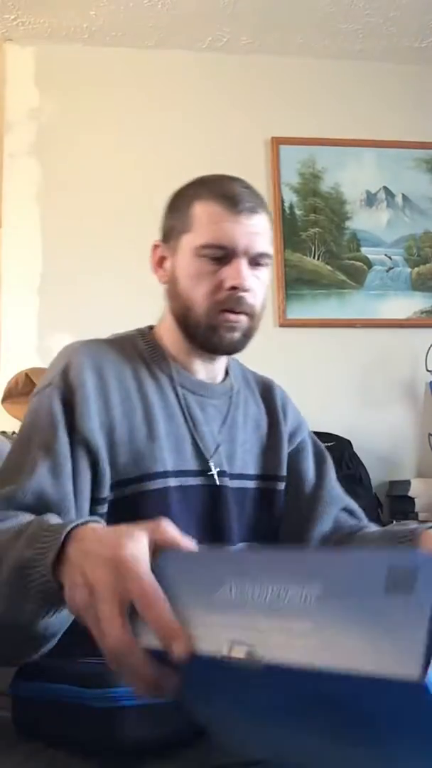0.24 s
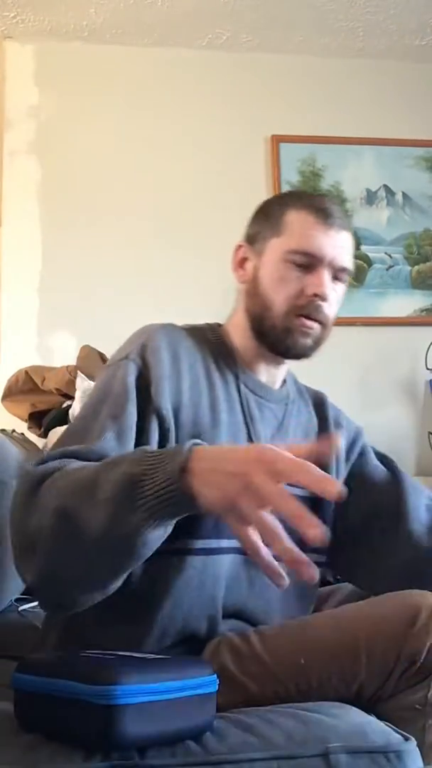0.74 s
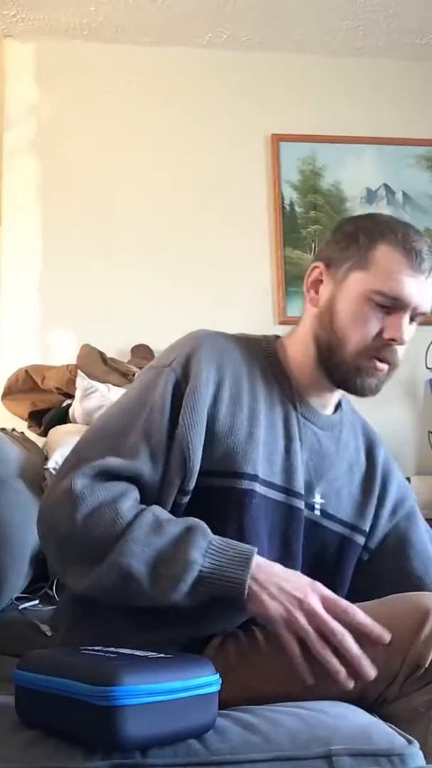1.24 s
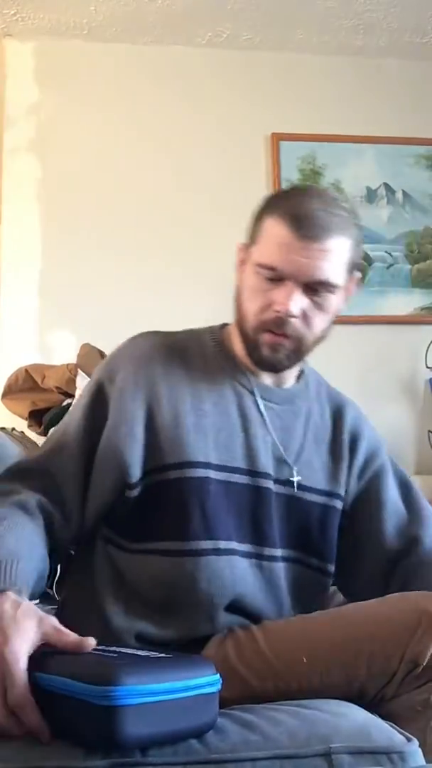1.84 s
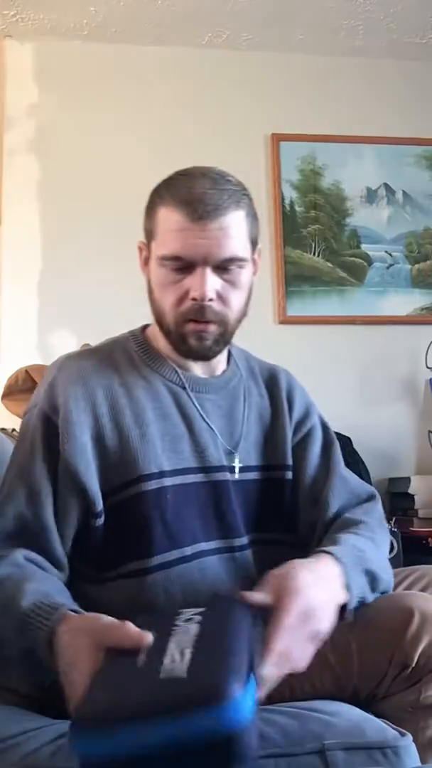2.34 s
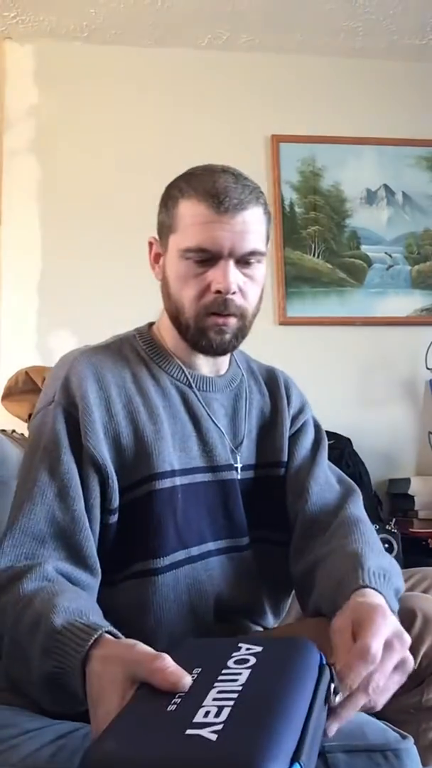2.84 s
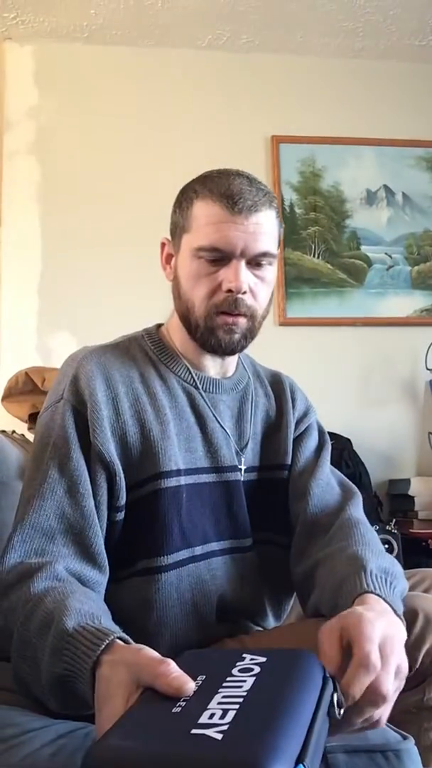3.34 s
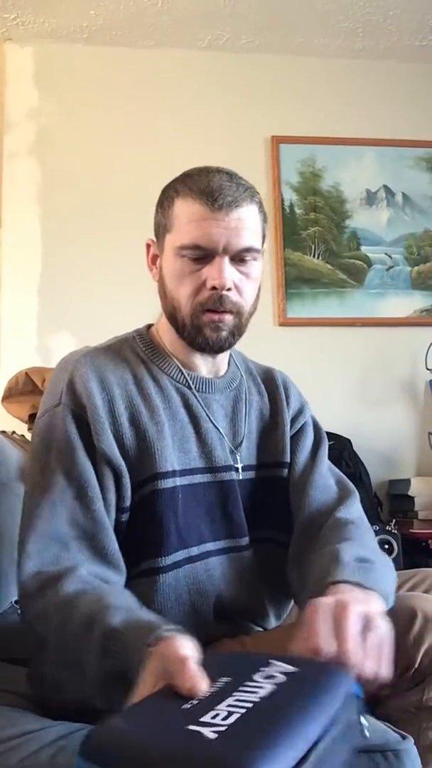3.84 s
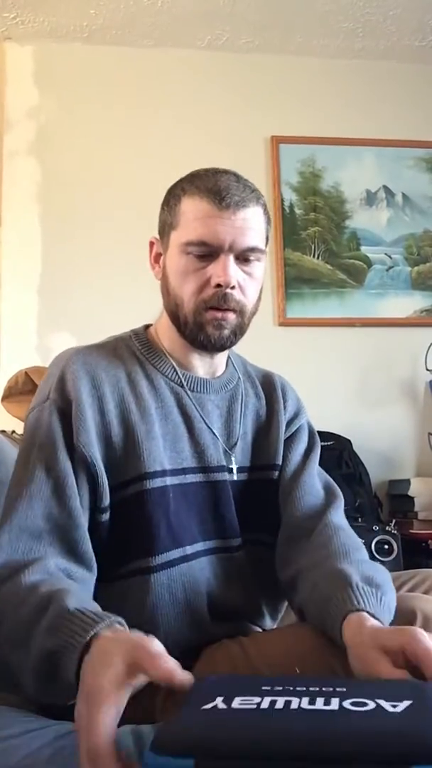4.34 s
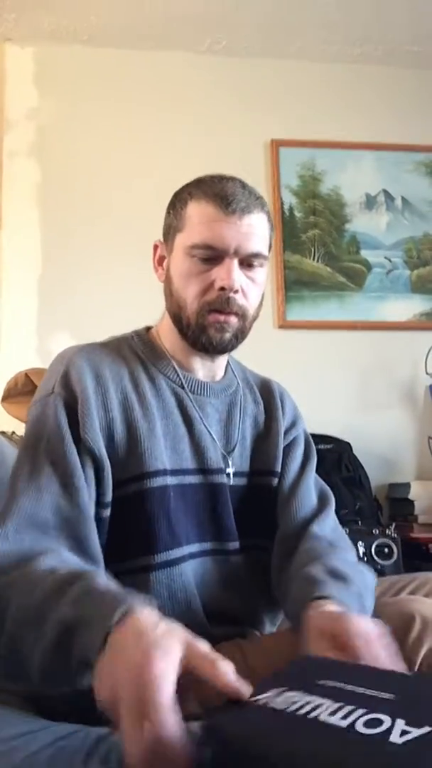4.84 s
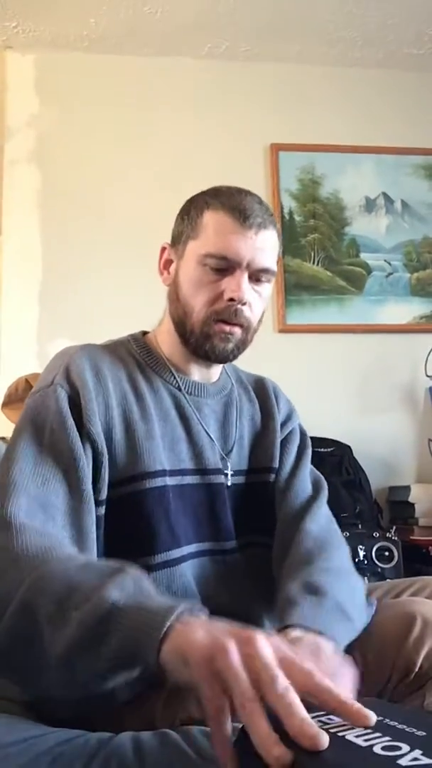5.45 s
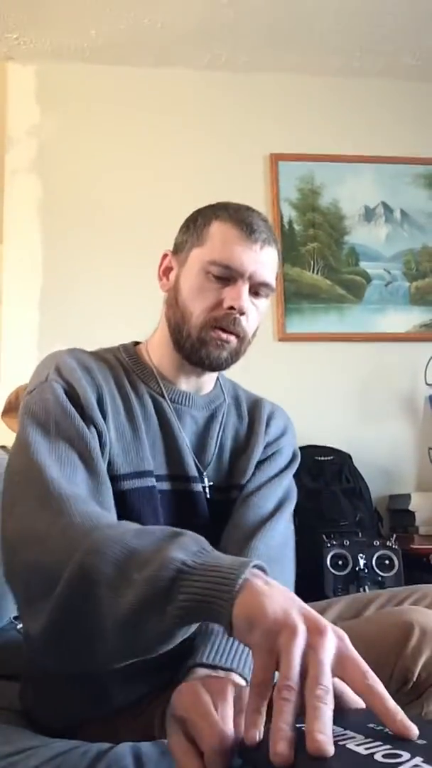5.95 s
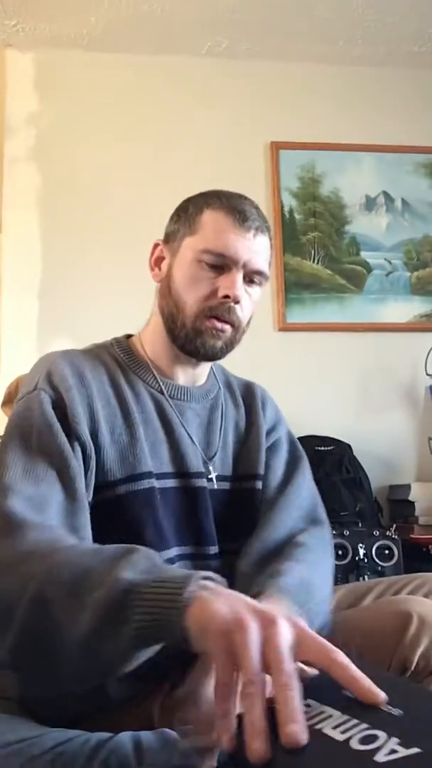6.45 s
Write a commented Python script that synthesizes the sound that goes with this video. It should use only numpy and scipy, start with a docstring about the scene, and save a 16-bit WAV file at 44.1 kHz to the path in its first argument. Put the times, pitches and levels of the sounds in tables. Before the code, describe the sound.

In a small living room, hands scuff a cardboard box and toss it aside. It lands with a double slap, the loudest sound, and slides a little. Close to the microphone, a hard case is then handled on a sofa with light knocks and cloth brushing. It is unzipped in quiet, separate tugs that tick when slow and rasp higher when fast, interrupted by a cluster of muffled bumps.

```python
"""A cardboard box rubs and squeaks against hands and clothes as a man lifts it off his lap.
Tossed aside in the small living room, it lands with a slap, tips over and slides; its panels ring.
He bumps and turns a hard carrying case on the sofa, then unzips it in several short pulls:
the slider ticks over the teeth, buzzing higher as it speeds up, and the shell of the case resounds."""
import sys
import numpy as np
from scipy import signal
from scipy.io import wavfile

SR = 44100
rng = np.random.default_rng(int(sys.argv[2]) if len(sys.argv) > 2 else 0)


def digitize_waveform(pressure):
    """Quantize a signal to 16-bit integers and store it at the path in sys.argv[1].

    Rows of a 2-D input are taken as channels; values are limited to [-1, 1].
    """
    field = np.atleast_2d(pressure).T
    bounded = np.clip(field, -1, 1)
    quanta = np.round(bounded * 32767).astype(np.int16)
    wavfile.write(sys.argv[1], SR, quanta)


N = 294588
TIME = np.arange(N) / SR


def amp(db):
    """Turns decibels into a number to multiply by."""
    return 10 ** (np.asarray(db) / 20)


def look_up(points, hz):
    """Reads between the rows of a table, on a log-frequency axis."""
    freqs, values = np.transpose(points)
    return np.interp(np.log(hz + 1), np.log(freqs), values)


def add(mix, start_s, sound):
    """Lays a sound into the mix."""
    part = mix[round(start_s * SR):][:len(sound)]
    part += sound[:len(part)]


def colour(x, spectrum, size=4096):
    """Gives a sound the tone of a (frequency, level) table; white noise keeps its power."""
    log_gain = np.log(amp(look_up(spectrum, abs(np.fft.fftfreq(size, 1 / SR)))))
    response = np.exp(np.conj(signal.hilbert(log_gain)))  # rings after a hit, never before
    kernel = np.fft.ifft(response).real[:size // 2]
    return signal.oaconvolve(x, kernel / np.linalg.norm(kernel))[:len(x)]


def soften(x, hz):
    """Dulls the sound above hz (a one-pole low-pass)."""
    pole = np.exp(-2 * np.pi * hz / SR)
    return signal.lfilter([1 - pole], [1, -pole], x)


def waver(hz):
    """A random wobble of typical size 1, up to about hz."""
    wobble = soften(soften(rng.standard_normal(N), hz), hz)
    return wobble / wobble.std()


def die_away(t, ring_s):
    """A fade that drops 60 dB in the ring time."""
    return np.exp(-np.log(1000) * t / ring_s)


def friction(per_s, spread_db):
    """Rubbing: tiny slips of uneven size at random moments."""
    slips = rng.standard_normal(N) * (rng.random(N) < per_s / SR)
    slips *= amp(spread_db * np.minimum(rng.exponential(1, N), 4))
    return slips / slips.std()


def stroke(peak_s, rise, fall, shape=1.6):
    """One movement swells to 1 and fades; shape 1 is pointed, 2 is a bell."""
    distance = np.maximum((peak_s - TIME) / rise, (TIME - peak_s) / fall)
    return np.exp(-np.minimum(distance, 12) ** shape)


def strokes(rows, column=0):
    """Loudness over time of many movements, using one of their level columns."""
    return np.sqrt(sum((amp(db[column]) * stroke(s, rise, fall)) ** 2 for s, rise, fall, *db in rows))


# how long the room echoes: (frequency [Hz], ring time [s])
ROOM_RING = [(100, 0.14), (300, 0.34), (800, 0.29), (2000, 0.34), (5000, 0.33), (14000, 0.36)]
def room(x, wet_db):
    """Adds reflections off the walls, at wet_db against the sound itself."""
    size = SR // 2
    echoes = rng.choice([-1., 1.], size) * (rng.random(size) < 4000 / SR) * (TIME[:size] > .004)
    hz, t, bands = signal.stft(echoes, SR, nperseg=256)
    fade = amp(-60 * t / look_up(ROOM_RING, hz)[:, None])
    tail = signal.istft(bands * fade, SR, nperseg=256)[1]
    return x + amp(wet_db) * signal.oaconvolve(x, tail / np.linalg.norm(tail))[:N]


# tone of the quiet room: (frequency [Hz], level [dB])
AIR_TONE = [(15, -38), (25, -10.5), (120, 3), (242, -1), (489, -10.5), (775, -9.5), (887, -18),
            (1190, -10.5), (1440, -15), (1740, -12.5), (2280, -20), (2990, -18.5), (10100, -32.5),
            (12900, -31.5), (16000, -41)]
def room_tone(level_db=-59):
    """The steady low murmur of the air, with faint microphone hiss."""
    return amp(level_db) * colour(rng.standard_normal(N), AIR_TONE)


# sleeves brushing the case; the case dragging on the sofa: (peak time [s], rise [s], fall [s], level [dB])
SLEEVE_BRUSHES = [(0.92, .2, 0.13, -67.5), (1.97, 0.075, 0.23, -65), (2.41, 0.1, 0.13, -62.5),
                  (2.89, .035, 0.024, -63), (3.08, .06, .35, -78), (4.05, 0.22, 0.23, -62.5),
                  (4.84, 0.066, 0.084, -64), (6.33, .12, 0.16, -68.5)]
SOFA_DRAGS = [(3.95, 0.055, .06, -56.5), (4.11, 0.044, 0.078, -59.5), (4.745, 0.019, 0.023, -54.5),
              (5.1, 0.027, 0.082, -50.5), (5.246, .03, 0.033, -44.5), (5.88, 0.095, 0.041, -58.5),
              (6.07, 0.033, .15, -60)]
# tone of each fabric: (frequency [Hz], level [dB])
SLEEVE_TONE = [(100, -8), (300, 11.5), (800, 2.5), (1700, 3), (2400, 4), (4000, -4.5), (6500, 0),
               (10000, -8), (12500, -8), (16000, -13)]
SOFA_TONE = [(60, -28), (200, 2), (400, 2.5), (700, 1.5), (1000, -10.5), (1700, -10.5), (2500, -11.5),
             (4500, -23.5), (16000, -36)]
def cloth(drag_db=-3):
    """Sleeve fibres catch as the hands move; the sofa gives a duller rub."""
    sleeves = strokes(SLEEVE_BRUSHES) * colour(friction(per_s=2800, spread_db=3), SLEEVE_TONE)
    sofa = strokes(SOFA_DRAGS) * colour(friction(per_s=900, spread_db=-3.5), SOFA_TONE)
    return room(sleeves + amp(drag_db) * sofa, wet_db=-4.5)


# the metal pull tab jingling: (time [s], pitch [Hz], level [dB], ring time [s])
JINGLES = [(2.846, 8700, -64, .05), (2.87, 8400, -66, .05), (6.043, 15300, -59, .06),
           (6.043, 8600, -62, .06), (6.098, 15300, -63, .07), (6.245, 8600, -66, .06)]
def tab_jingles():
    """The loose tab rings briefly against the slider."""
    out, t = np.zeros(N), TIME[:SR // 5]
    for s, hz, db, ring_s in JINGLES:
        add(out, s, amp(db) * np.sin(2 * np.pi * hz * t) * die_away(t, ring_s))
    return room(out, wet_db=-8)


# fingers and tab tapping box and case: (time [s], level [dB], extra level of the tick [dB])
FINGER_TAPS = [(0.085, -36, -21), (0.366, -49, -15), (0.388, -43, -4), (0.644, -49.5, 3), (2.126, -44, -30),
               (2.264, -43, -22), (2.845, -47, 3.5), (2.869, -45.5, -20), (2.989, -42, -9),
               (2.995, -44.5, 3.5), (3.652, -45, -16), (4.845, -42.5, -10), (5.093, -44, -8),
               (5.893, -45, -6), (6.043, -46, -1)]
# tone of the tapped shell, and of fine ticks and hiss: (frequency [Hz], level [dB])
KNOCK_TONE = [(100, 0), (350, 1), (600, 3), (1000, -4), (1300, 2), (1650, 6), (2300, -14), (3000, -6.5),
              (4200, -16), (8000, -23), (16000, -34)]
HISS_TONE = [(100, -35), (2000, -31), (3300, -10.5), (4400, -9.5), (6000, 0), (8800, -1), (10200, -5.5),
             (12000, 0.5), (14000, -3), (16000, -14.5)]
def taps(knock_db=12, tick_db=3, scatter=0.27):
    """Small hard contacts: a knock with a bright tick on top."""
    knock, tick, t = np.zeros(N), np.zeros(N), TIME[:SR // 50]
    for s, db, treble_db in FINGER_TAPS:
        contact = signal.unit_impulse(len(t)) + scatter * rng.standard_normal(len(t)) * np.exp(-t / .0017)
        add(knock, s, amp(db + knock_db) * contact)
        add(tick, s, amp(db + treble_db + tick_db) * contact)
    return room(colour(knock, KNOCK_TONE) + colour(tick, HISS_TONE), wet_db=-4.5)


# hands, box and case bumping: (time [s], level [dB], pitch [Hz])
SOFT_BUMPS = [(0.09, -41, 83), (.148, -41, 119), (.207, -45.5, 121), (0.385, -38.5, 90.5),
              (.475, -35.5, 570), (0.501, -39.5, 94), (.531, -30, 520), (0.934, -45, 298),
              (1.431, -34, 182), (1.796, -39, 166), (2.068, -42, 270), (2.127, -40.5, 221),
              (2.435, -44, 157), (2.872, -44.5, 310), (3.257, -45, 265), (3.878, -39.5, 235),
              (4.046, -41, 347), (4.624, -47, 205), (4.896, -28, 267), (5.068, -24, 278), (5.093, -26, 118),
              (5.168, -41, 158), (5.228, -35, 230), (5.254, -33, 207), (6.309, -43.5, 286)]
def bumps(rise_swings=0.35, scuff=0.36, soft_db=-43.5, soft_swings=14.8, smother=0.34):
    """Soft blows: a few fading swings with a dull scuff."""
    out, t = np.zeros(N), TIME[:SR // 3]
    for s, db, hz in SOFT_BUMPS:
        band = signal.butter(2, [hz / 2, 2 * hz], "band", fs=SR)
        noise = signal.lfilter(*band, rng.standard_normal(len(t)))
        thud = scuff * noise / noise.std() - np.sin(2 * np.pi * hz * t)
        # harder bumps press into the hands and cushion and die sooner
        swings = soft_swings * amp(smother * (soft_db - db))
        onset = 1 - np.exp(-(t * hz / rise_swings) ** 2)
        add(out, s, amp(db) * thud * onset * die_away(t, swings / hz))
    return room(soften(out, hz=755), wet_db=-5)


# the box squeaking under fingers or on the floor: (time [s], length [s], pitch [Hz], level [dB])
BOX_SQUEAKS = [(0.076, 0.01, 1650, -54), (0.386, 0.037, 3000, -50.5), (0.577, 0.059, 1725, -48.5),
               (0.631, 0.026, 2986, -51), (1.513, 0.093, 5900, -56)]
def box_squeaks(fuzz=0.075):
    """Cardboard sticks and slips, making short fuzzy notes that start abruptly."""
    out = np.zeros(N)
    for s, length, hz, db in BOX_SQUEAKS:
        t = TIME[:round(length * SR)]
        grip = (1 - np.exp(-t / 0.0025)) * (1 - (t / length) ** 2)
        note = np.sqrt(2) * waver(fuzz * hz)[:len(t)] * np.sin(2 * np.pi * hz * t)
        add(out, s, amp(db) * note * grip)
    return room(out, wet_db=-6.5)


# the box rubbing on hands and clothes, then skidding on the floor:
# (peak time [s], rise [s], fall [s], scrape level [dB], hiss level [dB])
LIFT_RUBS = [(0.025, 0.03, 0.063, -41.5, -46), (0.17, 0.1, 0.12, -58, -67),
             (0.397, 0.017, 0.027, -47.5, -58), (0.46, 0.032, 0.048, -53.5, -66),
             (0.592, 0.059, 0.023, -49.5, -56.5), (0.642, 0.013, 0.017, -45, -52.5)]
FLOOR_SKIDS = [(1.355, 0.032, 0.059, -48, -62), (1.43, .07, 0.061, -50, -43),
               (1.512, .009, .02, -54, -34.5), (1.545, 0.032, 0.015, -47.5, -32),
               (1.578, .025, 0.022, -46.5, -60), (1.612, 0.015, 0.016, -51.5, -46),
               (1.704, 0.017, 0.027, -41.5, -41)]
# tone of scraped cardboard: (frequency [Hz], level [dB])
SCRAPE_TONE = [(30, -60), (100, 1), (300, -1.5), (600, -7), (950, -6.5), (1400, -8), (1730, -2),
               (2300, -10), (3050, -4.5), (4000, -9.5), (7000, -14.5), (16000, -34)]
def box_rubbing(rows, scrape_db, hiss_db, wet_db, judder_db=2):
    """Sliding cardboard judders: coarse slips sound the panels, fine ones hiss."""
    scrape = strokes(rows, column=0) * colour(friction(per_s=4000, spread_db=3), SCRAPE_TONE)
    hiss = strokes(rows, column=1) * colour(rng.standard_normal(N), HISS_TONE)
    judder = amp(judder_db * waver(hz=108))
    return room((amp(scrape_db) * scrape + amp(hiss_db) * hiss) * judder, wet_db)


# the box hitting the floor, then tipping over:
# (time [s], level [dB], rise [s], settling time [s], duller above [Hz], crackle level [dB])
BOX_HITS = [(1.1261, -18.5, 0.0029, 0.0452, 3450, -43), (1.3075, -22.5, 0.00024, 0.0476, 1030, -41)]
# notes of the panels and the air inside: (pitch [Hz], level [dB], ring time [s])
BOX_NOTES = [(128, -6, .35), (157, 0, .35), (201, -3, .33), (241, -3, .3), (411, -3, .27), (547, -5, .27),
             (686, 0, .28), (798, -6, .27), (1035, -5, .25), (1181, -9, .25), (1260, -10, .25),
             (1336, -5, .22), (1432, -10, .22), (1552, -5, .22), (1633, -2, .22), (1702, -6, .25),
             (1731, 1, .33), (1855, -8, .22), (2207, -15, .2), (2570, -15, .22), (2955, -12, .24),
             (3128, -15, .24), (3295, -14, .2)]
# tone of slapped cardboard: (frequency [Hz], level [dB])
SLAP_TONE = [(40, -20), (90, -9), (160, -2), (250, -3), (330, -7), (450, -4), (700, -3), (900, -6),
             (1650, -2.5), (2150, -13), (3000, -9.5), (4200, -14), (8000, -25), (16000, -33)]
def box_landing(slap_db=-2.5, ring_db=-12.5):
    """Cardboard meets the floor in a crush of tiny contacts; the panels ring and the room answers."""
    slap, ring, crackle, t = np.zeros(N), np.zeros(N), np.zeros(N), TIME[:SR // 2]
    for s, db, rise, settle, dull_hz, crackle_db in BOX_HITS:
        onset = 1 - np.exp(-t / rise)
        press = onset * np.exp(-(t / settle) ** 2)
        crush = colour(soften(rng.standard_normal(len(t)), dull_hz), SLAP_TONE)
        add(slap, s, amp(db + slap_db) * press * crush / crush.std())
        add(crackle, s, amp(crackle_db) * press * friction(per_s=2900, spread_db=6)[:len(t)])
        for hz, note_db, ring_s in BOX_NOTES:
            note = np.sin(2 * np.pi * (hz * t + rng.random())) * die_away(t, ring_s)
            gain = amp(db + note_db + ring_db) / np.hypot(1, hz / dull_hz)
            add(ring, s, gain * onset * note)
    return room(slap, wet_db=-6) + ring + room(colour(crackle, HISS_TONE), wet_db=-4)


# three longer zip pulls: (peak time [s], rise [s], fall [s], teeth level [dB], tape level [dB])
ZIP_PULLS = [(3.865, 0.089, 0.056, -51, -54), (4.525, 0.072, 0.064, -53.5, -53),
             (5.52, .13, 0.075, -51.5, -58)]
# the slider's speed, one list for each pull: (time [s], speed [teeth/s])
PULL_SPEEDS = [
    [(3.6, 60), (3.7, 117), (3.76, 367), (3.795, 305), (3.845, 465), (3.868, 1066), (3.9, 265), (3.97, 105)],
    [(4.44, 175), (4.47, 453), (4.5, 1055), (4.545, 850), (4.587, 304), (4.66, 130)],
    [(5.33, 222), (5.37, 370), (5.41, 325), (5.46, 390), (5.5, 304), (5.53, 373), (5.595, 300),
     (5.615, 440), (5.69, 295)],
]
# short tugs: (peak time [s], rise [s], fall [s], teeth level [dB], tape level [dB], top speed [teeth/s])
ZIP_TUGS = [(3.68, .035, .055, -52.5, -54, 110), (4.75, .035, .12, -62.5, -64.5, 455),
            (5.105, .022, .07, -50, -55, 162), (5.293, .045, .028, -51, -60, 240),
            (5.819, .022, 0.039, -54.5, -55, 73), (5.895, 0.021, .04, -55.5, -51, 125),
            (6.048, .012, 0.062, -52, -53, 94)]
def slider_motion(usual_teeth_per_s=406, creep_teeth_per_s=55):
    """The slider's speed and its force on teeth and cloth tape: the faster and tauter, the louder."""
    speeds = [np.interp(TIME, *np.transpose(curve), left=0, right=0) for curve in PULL_SPEEDS]
    speeds += [top * np.sqrt(stroke(s, rise, fall)) for s, rise, fall, _, _, top in ZIP_TUGS]
    teeth, tape = np.zeros(N), np.zeros(N)
    for speed, (s, rise, fall, teeth_db, tape_db, *_) in zip(speeds, ZIP_PULLS + ZIP_TUGS):
        pace, tension = speed / usual_teeth_per_s, stroke(s, rise, fall)
        teeth += amp(teeth_db) * np.sqrt(tension) * pace ** 0.6
        tape += amp(tape_db) * tension * pace ** 0.77
    return np.maximum(np.max(speeds, axis=0), creep_teeth_per_s), teeth, tape


def shell_echoes(x):
    """Waves run to and fro in the shell, smearing each tick over a few milliseconds."""
    for delay in (13, 37, 71):  # samples
        loop = np.r_[1, np.zeros(delay - 1), .5]
        x = signal.lfilter(loop[::-1], loop, x)
    return x


def tooth_ticks(teeth_passed, speed, jitter=.04, uneven_db=3):
    """One tick for each tooth, a little off in timing and strength."""
    at = np.flatnonzero(np.diff(np.floor(teeth_passed)))
    gap = SR / speed[at]  # samples between teeth
    late, strength = rng.standard_normal((len(at), 2)).T
    shift = np.round(jitter * late * gap).astype(int)
    ticks = np.zeros(N)
    ticks[np.clip(at + shift, 0, N - 1)] = amp(uneven_db * strength) * np.sqrt(gap)
    return ticks


# tone of the case's shell, the clacking slider and the rubbed tape: (frequency [Hz], level [dB])
SHELL_TONE = [(60, -14), (170, 0.5), (370, 9), (520, 0), (900, -3), (1200, 0.5), (1700, 0.5), (2350, -6.5),
              (2950, -6), (3900, -14.5), (6500, -19.5), (10000, -25.5), (12500, -24), (16000, -31)]
CLACK_TONE = [(300, -12), (1200, -15.5), (1550, 0.5), (1800, 8), (2300, -8), (3000, 2), (4000, -26),
              (16000, -37)]
TAPE_TONE = [(200, -29), (1500, -9.5), (2600, 1), (3800, 3), (5000, 4), (7700, 2), (10000, -8.5),
             (12500, -4), (16000, -17)]
def zipper(clack_db=-2, tape_db=-1, whine_db=-5, clack_per_s=180, whine_per_s=550, grind_s=0.0011):
    """Slow teeth clack the slider one by one; fast ones merge into a whine in the shell."""
    speed, force, rub = slider_motion()
    speed = speed * (1 + .03 * waver(hz=60.2))  # the hand never pulls evenly
    teeth_passed = np.cumsum(speed) / SR
    ticks = tooth_ticks(teeth_passed, speed)
    # each tooth grinds briefly as it parts from its neighbour
    since_tooth_s = (teeth_passed % 1) / speed
    grind = rng.standard_normal(N) * np.exp(-since_tooth_s / grind_s)
    grind /= np.sqrt(np.minimum(speed * grind_s / 2, 1))
    drive = ticks + .5 * grind
    slow = 1 / (1 + (speed / clack_per_s) ** 4)  # near 1 when creeping, near 0 when fast
    # three harmonics swell and fade at random, as if gliding across the shell's resonances
    whine = sum(np.sin(2 * np.pi * k * teeth_passed) * amp(4 * waver(hz=50)) / np.sqrt(k)
                for k in (1, 2, 3))
    whine *= amp(whine_db) * force / (1 + (whine_per_s / speed) ** 2)
    shell = shell_echoes(colour(force * np.sqrt(1 - .5 * slow) * drive, SHELL_TONE))
    clack = amp(clack_db) * colour(force * np.sqrt(slow) * drive, CLACK_TONE)
    rasp = .49 * grind + .66 * ticks + .5 * friction(per_s=1400, spread_db=-4)
    tape = amp(tape_db) * colour(rub * rasp, TAPE_TONE)
    return room(shell + clack + tape + whine, wet_db=-7)


def scene():
    """Box, case and room together in one channel."""
    lift = box_rubbing(LIFT_RUBS, scrape_db=-4, hiss_db=-1.5, wet_db=-7)
    slide = box_rubbing(FLOOR_SKIDS, scrape_db=-2, hiss_db=-5, wet_db=-4.5)
    box = lift + box_squeaks() + box_landing() + slide
    case = zipper() + tab_jingles() + bumps() + taps() + cloth()
    return (box + case + room_tone())[None]


def record(dry):
    """The microphone loses the deepest bass and the highest treble."""
    bass_cut = signal.butter(4, 42, "high", fs=SR, output="sos")
    treble_cut = signal.firwin(511, 15950, window=("kaiser", 9), fs=SR)
    return signal.oaconvolve(signal.sosfilt(bass_cut, dry), treble_cut[None], "same")


dry = scene()
out = record(dry)
digitize_waveform(out)
```